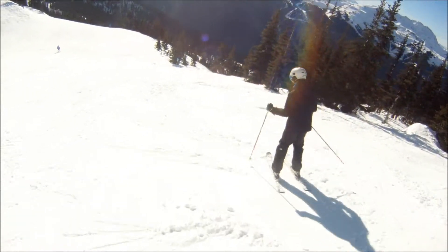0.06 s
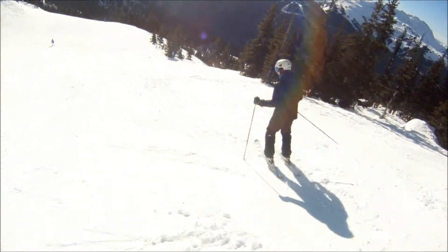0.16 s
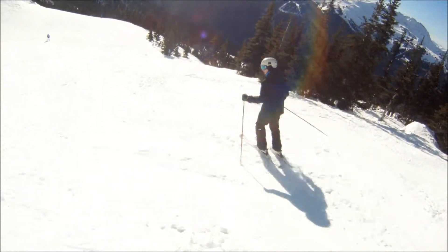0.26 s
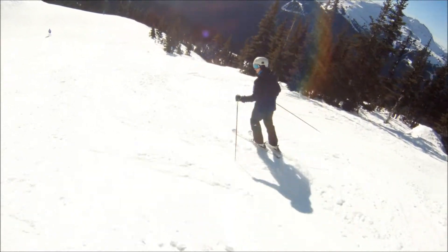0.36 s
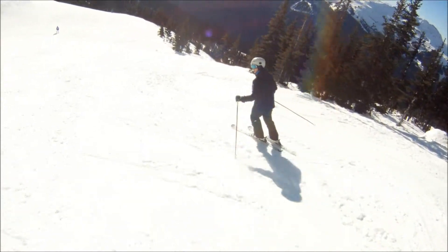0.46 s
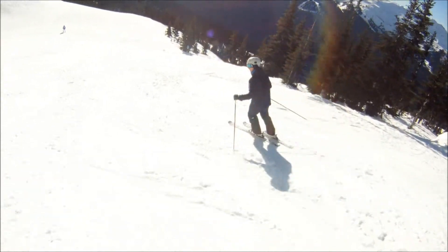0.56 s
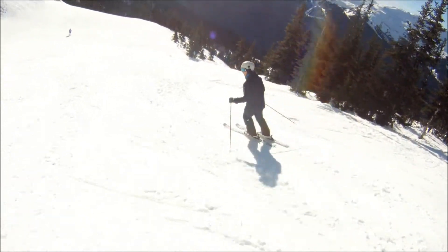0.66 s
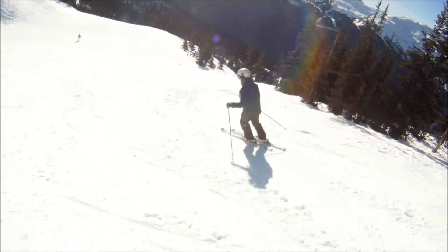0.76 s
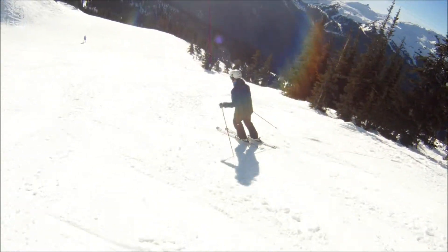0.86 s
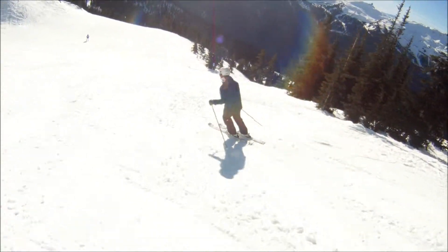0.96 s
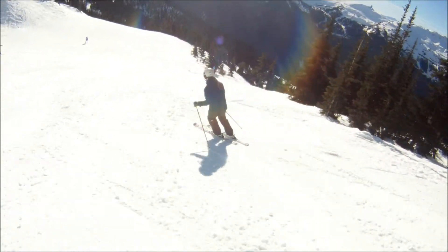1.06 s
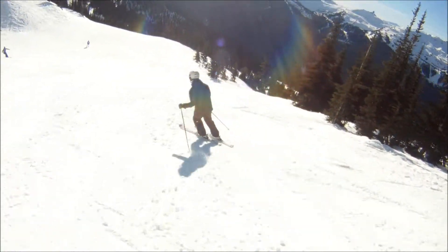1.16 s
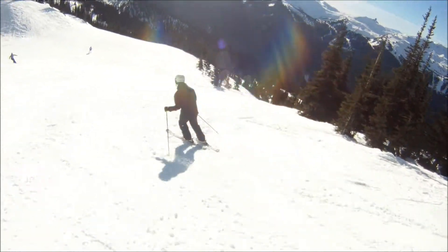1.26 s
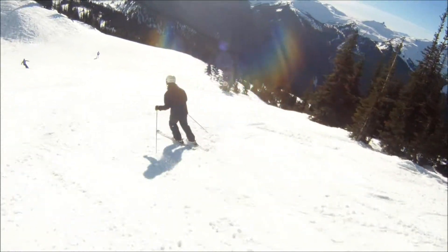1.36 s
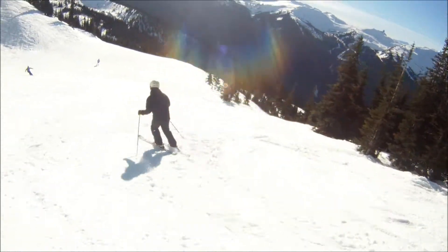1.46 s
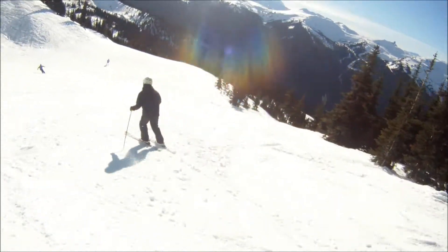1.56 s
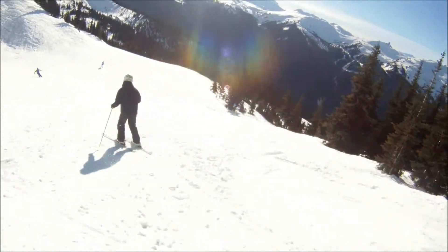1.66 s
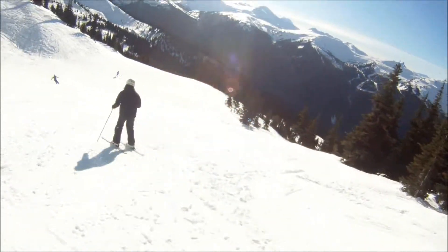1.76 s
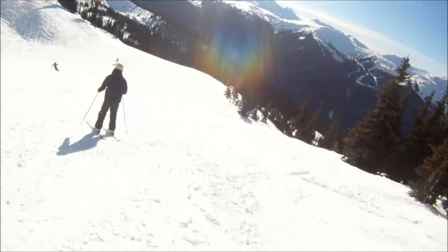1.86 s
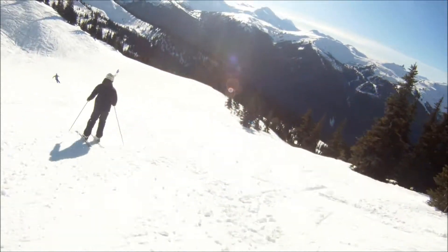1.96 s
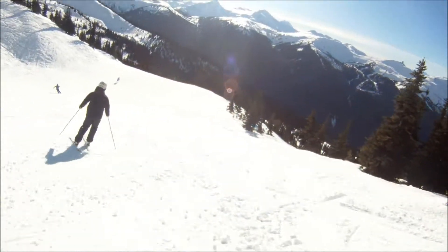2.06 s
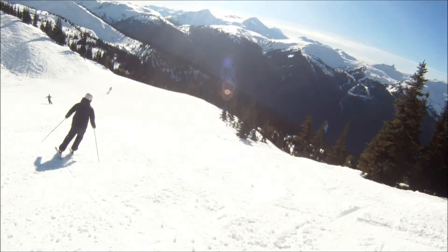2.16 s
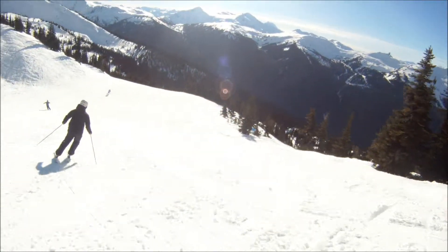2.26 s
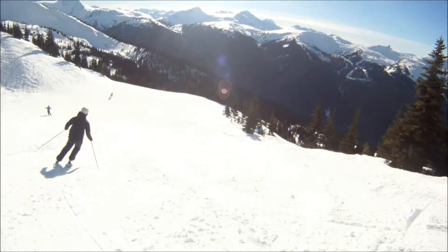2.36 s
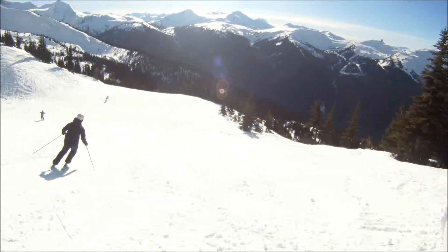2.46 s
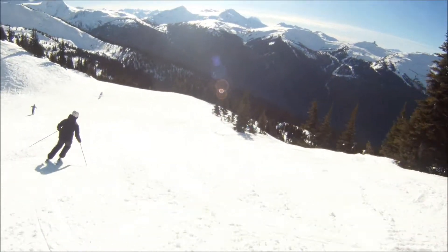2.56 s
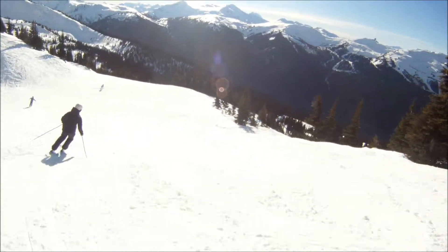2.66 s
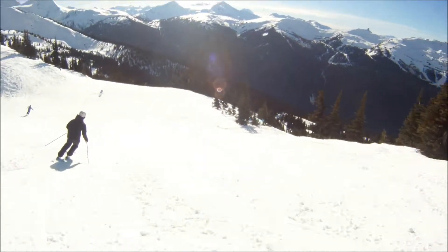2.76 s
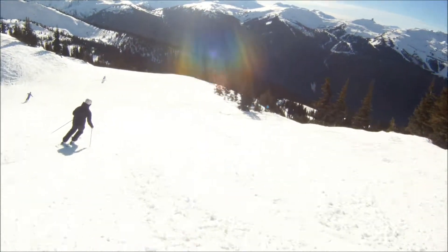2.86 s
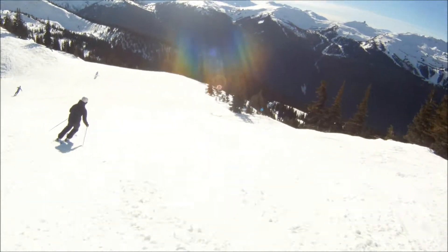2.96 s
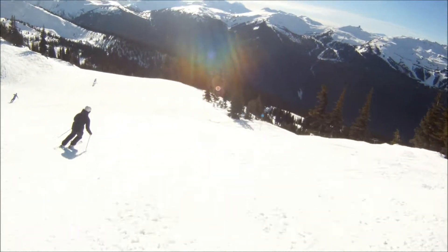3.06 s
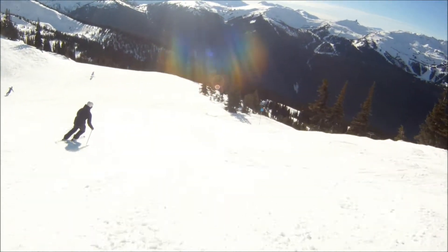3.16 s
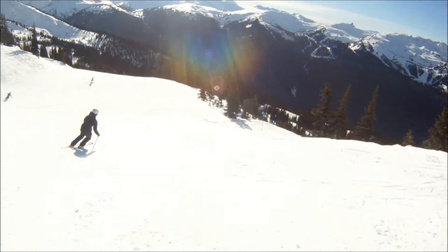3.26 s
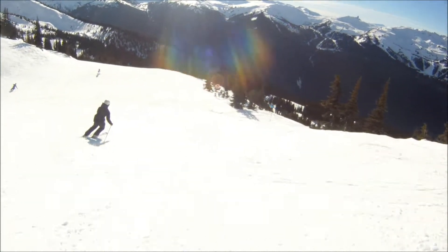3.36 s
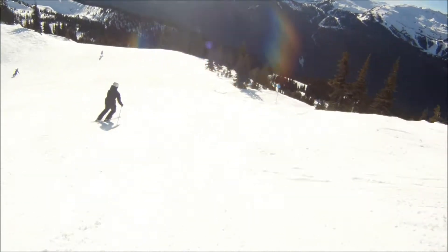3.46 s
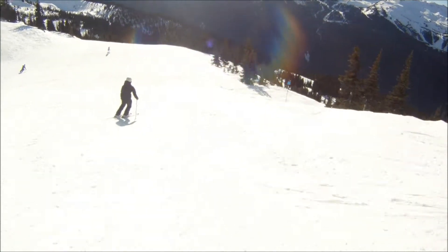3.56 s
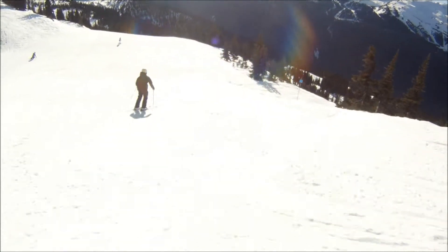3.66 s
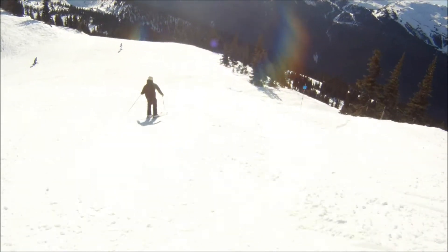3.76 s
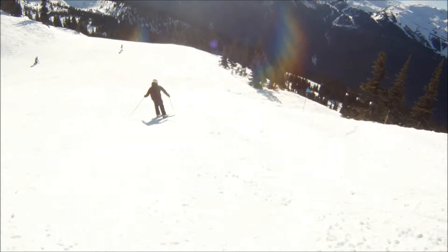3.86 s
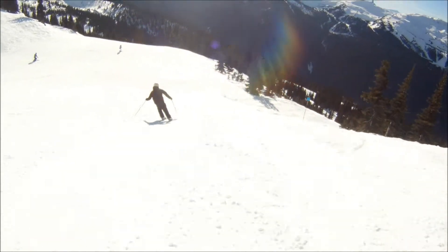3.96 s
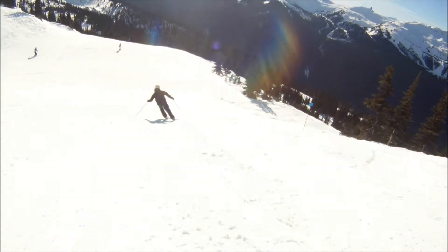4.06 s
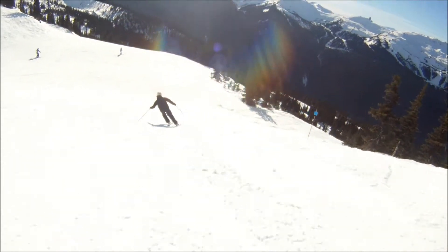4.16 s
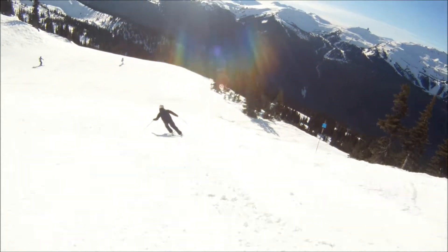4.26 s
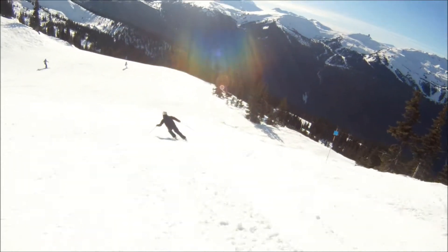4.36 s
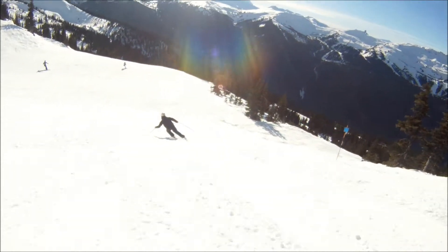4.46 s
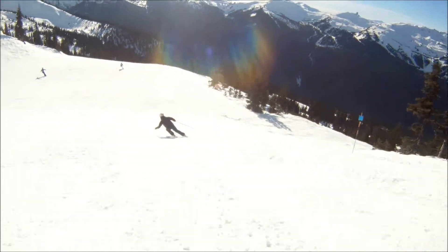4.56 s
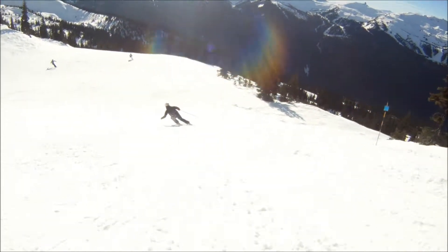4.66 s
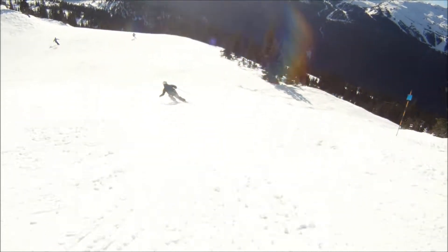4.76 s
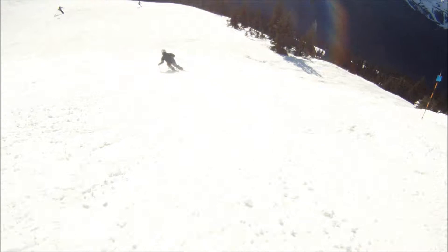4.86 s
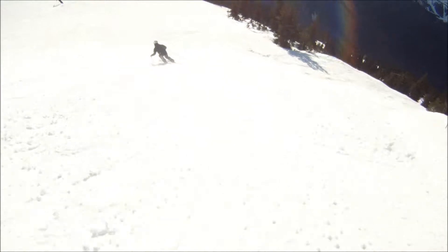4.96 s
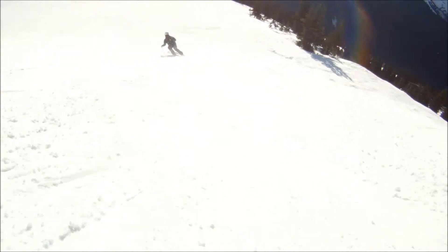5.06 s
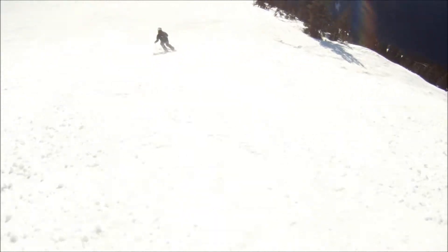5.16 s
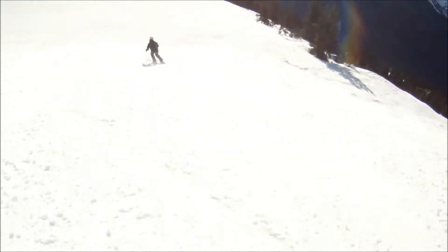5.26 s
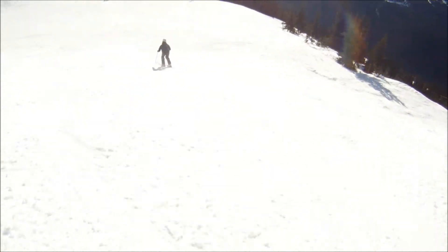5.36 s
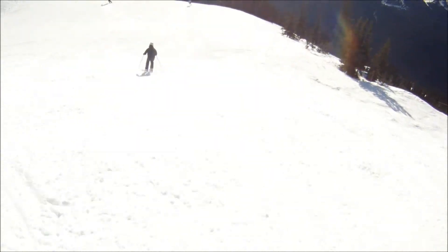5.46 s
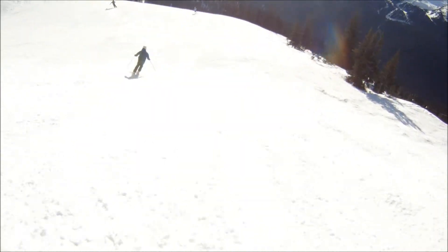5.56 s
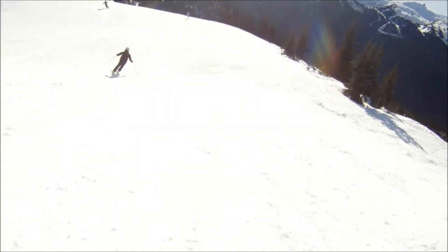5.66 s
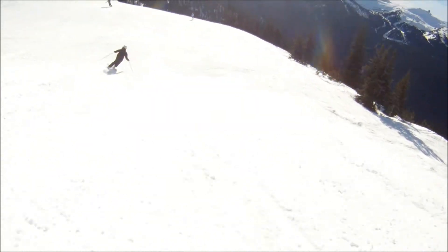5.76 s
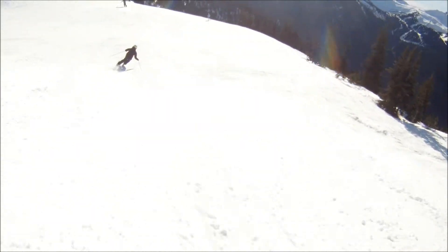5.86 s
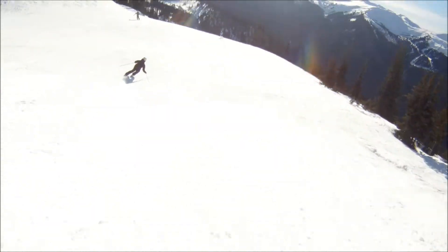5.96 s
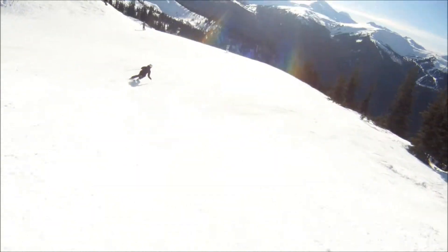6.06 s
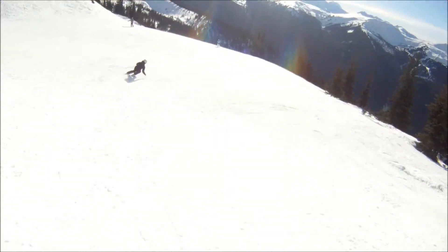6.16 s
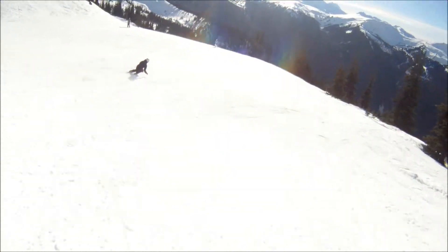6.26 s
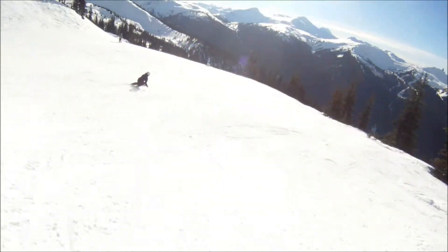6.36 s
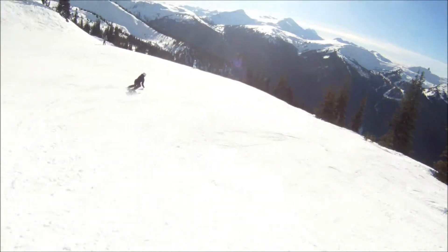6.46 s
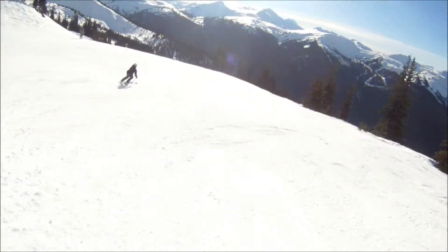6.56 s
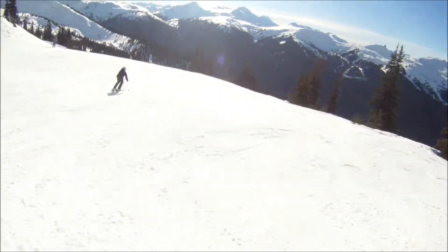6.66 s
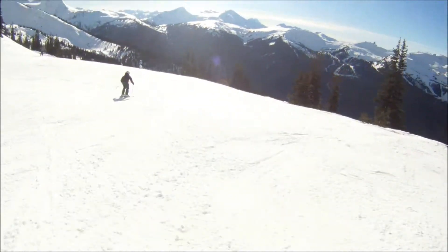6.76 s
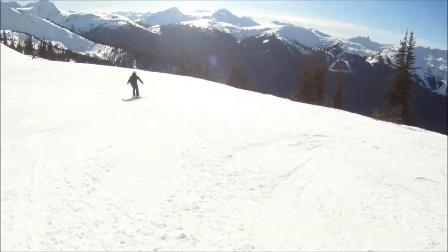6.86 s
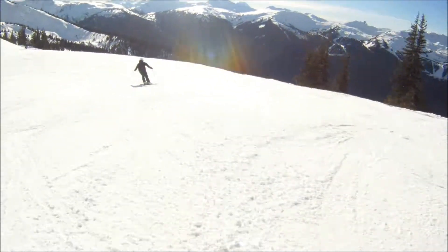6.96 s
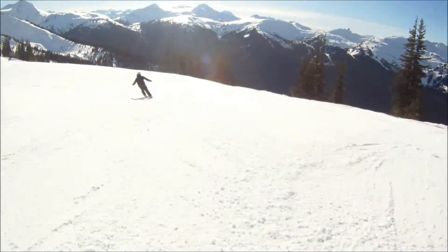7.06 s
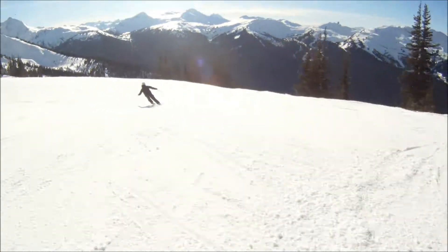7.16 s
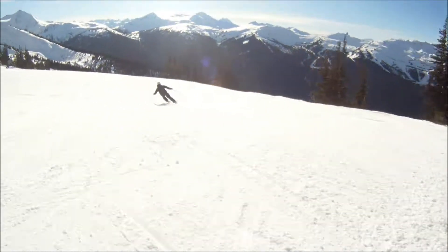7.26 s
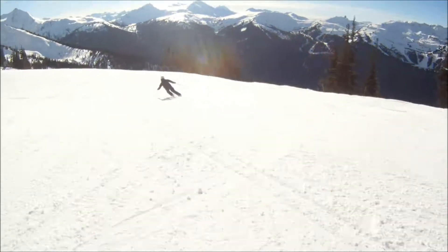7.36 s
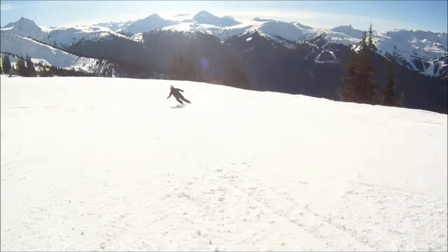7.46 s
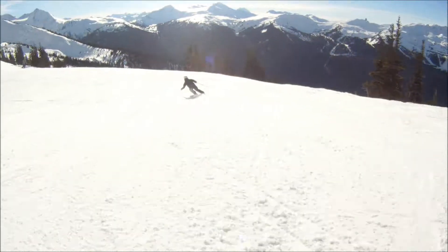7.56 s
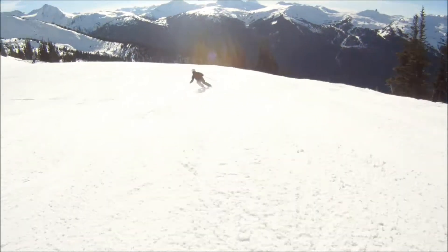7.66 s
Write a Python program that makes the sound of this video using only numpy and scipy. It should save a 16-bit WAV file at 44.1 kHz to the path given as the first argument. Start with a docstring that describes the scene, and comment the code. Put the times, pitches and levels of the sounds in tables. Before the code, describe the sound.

Skis gather speed over packed snow, a faint hiss growing into a gritty, boxy roar with low wind buffeting and sharp camera knocks.

```python
"""Skis gather speed on packed snow: the bases rush, the edges throw up crystals and the skis judder.
Snow noise is random grain snaps over smooth friction, coloured by the camera's closed plastic case.
One hollow note, short rasps and crumbs of crushed ice join it; ruts swell a low body rumble.
Wind noise buffets the case, decaying sines make the jolts and knocks, and a faint hiss lies below.
The camera samples slowly and holds each value, which mirrors the sound into a gritty treble."""
import sys
import numpy as np
from scipy import signal
from scipy.fft import rfft, irfft
from scipy.io import wavfile
from scipy.ndimage import uniform_filter1d

SR = 44100
rng = np.random.default_rng(int(sys.argv[2]) if len(sys.argv) > 2 else 0)


def output_pcm(signal):
    """Save a mono or channel-first signal as 16-bit PCM at the path in sys.argv[1].

    Samples are clipped to [-1, 1] before scaling.
    """
    pcm = np.clip(np.atleast_2d(signal).T, -1, 1) * 32767
    wavfile.write(sys.argv[1], SR, np.round(pcm).astype(np.int16))


N = 339570
TIME = np.arange(N) / SR
HZ = np.maximum(np.arange(N // 2 + 1) * SR / N, 1)   # spectrum bins, kept off zero


def from_db(db):
    """Decibels to gain."""
    return 10 ** (np.asarray(db) / 20)


def rms_one(x):
    """Scale to rms 1."""
    return x / np.sqrt(np.mean(x ** 2) + 1e-20)


def in_time(rows):
    """Read each column of a curve at every sample."""
    times, *columns = np.transpose(rows)
    return [np.interp(TIME, times, column) for column in columns]


def slope_db(points):
    """A spectrum joined by straight lines in log frequency."""
    hz, db = np.transpose(points)
    return np.interp(np.log(HZ), np.log(hz), db)


def coloured(x, db):
    """Give a noise a spectrum; rms 1."""
    return rms_one(irfft(rfft(x) * from_db(db), N))


def above_db(edge_hz, order):
    """Response of a high-pass."""
    return -10 * np.log10(1 + (edge_hz / HZ) ** (2 * order))


def below_db(edge_hz, order):
    """Response of a low-pass."""
    return -10 * np.log10(1 + (HZ / edge_hz) ** (2 * order))


def drift(rate_hz):
    """Slow random wandering with rms 1."""
    return coloured(rng.standard_normal(N), below_db(rate_hz, order=2))


def bell(t, spread):
    """A smooth rise and fall of height 1 around one moment."""
    return np.exp(-.5 * ((TIME - t) / spread) ** 2)


def swells(rows):
    """One smooth rise and fall for each event, a row apiece."""
    return np.array([size * bell(t, spread) for t, size, spread in rows])


def with_swells(base_db, rows):
    """A level with swells on top, added in power; as a gain."""
    peaks = swells([(t, from_db(db), spread) for t, db, spread in rows])
    return np.sqrt(from_db(base_db) ** 2 + np.sum(peaks ** 2, axis=0))


def ring(drive, hz, t60):
    """A two-pole resonator: a unit click sets a decaying sine of about height 1 ringing."""
    radius = from_db(-60 / (t60 * SR))
    turn = 2 * np.pi * hz / SR   # radians per sample
    feedback = [1, -2 * radius * np.cos(turn), radius * radius]
    return signal.lfilter([0, np.sin(turn)], feedback, drive + 1e-18)


def strikes(times, db):
    """One click for each blow."""
    clicks = np.zeros(N)
    clicks[np.round(times * SR).astype(int)] = from_db(db)
    return clicks


def crystals(per_s, size_db, smooth_db):
    """Snow grains snap at random with uneven sizes, over smooth friction of the base; rms 1."""
    unevenness = np.minimum(rng.exponential(1, N), 3)
    sizes = from_db(size_db * unevenness) * rng.choice([-1, 1], N)
    snaps = rng.random(N) < per_s / SR
    grains = sizes * snaps / np.sqrt(per_s)   # more grains, each smaller: the level stays even
    friction = from_db(smooth_db) * rng.standard_normal(N)
    return rms_one(rms_one(grains) + friction)


# Broad tone of snow noise inside the case: f/Hz, relative level/dB
CASE_TONE = [(250, -13.5), (420, -18), (620, -9), (1000, -8), (3300, -8.5), (3750, -18.5), (5400, -26.5),
             (5900, -29)]
# Resonances (boosts) and hollows (cuts) of the case: f/Hz, width at half the dB/Hz, level/dB
CASE_RESONANCES = [(240, 24, -2.5), (768, 126, 4.5), (922, 116, 5), (1058, 46, 4), (1228, 230, -6),
                   (1480, 190, -0.5), (1790, 200, -2.5), (2240, 410, 3), (2620, 110, 4), (3212, 73, 4),
                   (3594, 100, 3.5), (3860, 150, -2.5), (4000, 170, 3), (4420, 270, -3.5), (4800, 240, 4)]


def case_db():
    """The closed case passes some pitches and swallows others."""
    response = slope_db(CASE_TONE)
    for hz, width, db in CASE_RESONANCES:
        response = response + db * .5 ** ((2 * (HZ - hz) / width) ** 2)
    return response


# Tone of the faint hiss: f/Hz, relative level/dB
HISS_TONE = [(100, 2.5), (700, 4), (1200, -0.5), (2200, 1), (2620, 5), (2820, -4), (3000, 2), (3170, -4),
             (3650, 4), (3860, -8), (4040, -2.5), (4550, -12), (4880, -8), (5800, -16)]


def soft_hiss():
    """A faint, finely crackling hiss: small grains over smooth noise, wavering slightly."""
    level = from_db(-56.5 + 1.0 * drift(25))
    return level * coloured(crystals(2500, size_db=-0.5, smooth_db=2.0), slope_db(HISS_TONE))


BREEZE_DB, BREEZE_FOLLOWS = -39, 0.15   # level at the reference speed; share of the speed's dB swing
# Tone of the buffeting: f/Hz, relative level/dB
BUFFET_TONE = [(10, -1.5), (22, -5), (33, 1), (42, 4), (52, -8.5), (70, -22), (120, -42), (300, -68)]
# Gusts on the case: t/s, peak level/dB, spread/s
WIND_GUSTS = [(0.605, -33.5, 0.024), (0.694, -39, .022), (1.156, -36, .04), (1.45, -30.5, 0.055),
              (1.757, -36.5, 0.087), (2.003, -31.5, 0.037), (2.5, -35, 0.033), (2.858, -32, 0.12),
              (3.346, -38.5, .09), (4.25, -40, 0.097), (4.917, -36, 0.06), (5.687, -29.5, .06),
              (6.013, -28, 0.094), (7.264, -31.5, 0.19)]
# Drops in the breeze: t/s, loss of level/dB, spread/s
WIND_LULLS = [(.79, 8, 0.03), (3.65, 15, 0.064), (4.53, 8, .07), (5.14, 10.5, 0.044)]


def wind(speed_db):
    """Eddies push on the case in low, lumpy waves: a breeze that grows with speed, gusts and lulls."""
    breeze_db = BREEZE_DB + BREEZE_FOLLOWS * speed_db - swells(WIND_LULLS).sum(axis=0)
    strength = with_swells(breeze_db, WIND_GUSTS)
    eddies = coloured(rng.standard_normal(N), slope_db(BUFFET_TONE))
    # dividing by the local level evens out the lumps
    lumps = np.sqrt(uniform_filter1d(eddies ** 2, size=7000) + 0.017)
    return strength * eddies / lumps


# Jolts that sway the camera: t/s, drive level/dB (the strongest also sets the peak of the layer)
ARM_JOLTS = [(.206, -27.5), (1.391, -27), (1.446, -21), (1.652, -20), (2.801, -30), (5.833, -21.5),
             (5.918, -11), (6.229, -14.5)]


def jolts(sway_hz=39, t60=0.11):
    """Two resonators in a row make each jolt swell, then die away in a few slow swings."""
    times, db = np.transpose(ARM_JOLTS)
    sway = ring(ring(strikes(times, db), sway_hz, t60), sway_hz, t60 / 2)
    return -from_db(db.max()) * sway / np.abs(sway).max()


# Knocks on the mount: t/s, dull thud drive level/dB, hard clack drive level/dB
MOUNT_KNOCKS = [(1.336, -37, -32), (1.438, -40, -40), (1.596, -43, -31), (1.737, -32, -44),
                (2.048, -42, -42), (2.3677, -26, -24.5), (2.786, -32, -34), (5.475, -34, -35.5),
                (5.8309, -22, -8), (5.9202, -19.5, -11.5), (6.092, -32, -40), (6.179, -30, -35.5)]
# Ringing modes of the mount and case: f/Hz, relative level/dB, time to fall 60 dB/s
MOUNT_MODES = [(98, 0, 0.043), (187, -4.5, 0.051), (232.6, -5, 0.12), (468, -36, 0.0051), (820, -13, 0.053),
               (888, -4, 0.027), (1110, -16, 0.015)]


def knocks(split_hz=400):
    """The camera bumps in its mount: the arm rings the low modes, the case the high ones."""
    times, thud_db, clack_db = np.transpose(MOUNT_KNOCKS)
    thud, clack = strikes(times, thud_db), strikes(times, clack_db)
    ringing = np.zeros(N)
    for hz, db, t60 in MOUNT_MODES:
        blow = thud if hz < split_hz else clack
        ringing += from_db(db) * ring(blow, hz, t60)
    return -ringing


# Crumbs of ice crushed under an edge: t/s, level before the shower gain/dB, decay/s
ICE_CRUMBS = [(.047, -60, .006), (.082, -59, 0.011), (.167, -54, .006), (0.775, -55, .014),
              (1.453, -47, .006), (1.468, -47, 0.01), (1.596, -48, 0.009), (1.722, -42, .003),
              (1.836, -48.5, 0.019)]


def crunches():
    """Each crumb of ice bursts into a sudden, short shower of bright grains."""
    shower = np.zeros(N)
    for t, db, decay in ICE_CRUMBS:
        shower += from_db(db) * (TIME >= t) * np.exp(-np.abs(TIME - t) / decay)
    tone = 0.53 * case_db() + above_db(3700, order=1) + below_db(4600, order=8)
    return 1.84 * shower * coloured(crystals(4500, size_db=6.0, smooth_db=-11), tone)


# An edge bites and rasps on one pitch: t/s, f/Hz, level/dB, spread/s
EDGE_RASPS = [(2.24, 1690, -41, .012), (5.336, 1480, -36.5, 0.089)]


def rasps(width_hz=200):
    """A biting edge sticks and slips, which gathers its noise around one pitch."""
    out = np.zeros(N)
    for t, hz, db, spread in EDGE_RASPS:
        peak_db = -20 * np.log10(1 + (2 * (HZ - hz) / width_hz) ** 2)
        rasp = coloured(rng.standard_normal(N), peak_db)
        out += from_db(db) * bell(t, spread) * rasp
    return out


NOTE_DB, NOTE_FOLLOWS = -38.5, 0.76   # level at the reference speed; share of the speed's dB swing
FLARE_SPREAD_S = 0.019
# Flares of the hollow note under the running edges: t/s, peak level/dB
NOTE_FLARES = [(.27, -55), (.42, -51), (.75, -48), (1.15, -54), (1.27, -45.5), (2.05, -42), (2.14, -41)]


def hollow_note(speed_db, hard_db, hz=768, t60=0.032):
    """Friction noise keeps a narrow resonance sounding, stronger at speed and on hard snow."""
    flares = [(t, db, FLARE_SPREAD_S) for t, db in NOTE_FLARES]
    strength = with_swells(NOTE_DB + NOTE_FOLLOWS * speed_db + hard_db, flares)
    return strength * rms_one(ring(ring(rng.standard_normal(N), hz, t60), hz, t60 / 2))


RUMBLE_DB, RUMBLE_FOLLOWS = -43, 0.58   # level at the reference speed; share of the speed's dB swing
RUMBLE_PER_HARDNESS = 0.46   # dB for each dB of hardness
# Tone of the rumble through the skier's body: f/Hz, relative level/dB
RUMBLE_TONE = [(30, -1), (70, 0.5), (110, 0.5), (190, -3), (241, 0.5), (290, -9), (420, -9), (800, -35)]
# Rutted patches that shake the skier: t/s, rumble level/dB, spread/s
RUT_PATCHES = [(.17, -56, .09), (1.45, -49, .06), (1.76, -48, 0.11), (4.8, -47, .14), (6.22, -41.5, .08),
               (7.15, -38, 0.18), (7.55, -39, .08)]


def body_rumble(speed_db, hard_db):
    """The skier's body carries low shaking, stronger at speed, on hard snow and over ruts."""
    steady_db = RUMBLE_DB + RUMBLE_FOLLOWS * speed_db + RUMBLE_PER_HARDNESS * hard_db
    shaking = with_swells(steady_db, RUT_PATCHES) * from_db(0.66 * drift(8.4))
    return shaking * coloured(rng.standard_normal(N), slope_db(RUMBLE_TONE))


TOP_SPEED_DB = -27.5   # reference speed, as a level of the rush before its trim
# The run: t/s, speed as rush level before its trim/dB, relative hardness of the snow/dB
SKI_RUN = [(0, -61, -4), (.3, -62, -0.5), (.5, -56, -2), (.8, -54.5, 1.5), (1.3, -48, -1),
           (1.95, -41.5, -1), (2.55, -41, 1), (3.3, -36.5, -0.5), (3.75, -36, 0), (4.15, -32.5, 0.5),
           (4.4, -33.5, -2), (5.0, -33, 2), (5.35, -30.5, -0.5), (5.8, -29.5, 1.5), (6.15, -29.5, -1),
           (6.75, -28, -0.5), (7.2, -27, 0), (7.7, -28, 2.5)]
# The edges dig in: t/s, extra load level/dB, spread/s
EDGE_BITES = [(1.462, 3.5, 0.022), (1.65, 4, 0.037), (1.87, 0.5, .025), (2.27, 2.8, 0.025),
              (2.76, 1.1, 0.068), (6.68, 2, .03)]
# The skis go light between turns: t/s, load level lost/dB, fading time on each side/s
TURN_RELEASES = [(1.54, 2.5, .02), (1.775, 2.5, 0.023), (3.58, 3, .07), (4.49, 2, 0.037), (5.153, 9, 0.045),
                 (6.08, 2.5, 0.026), (6.59, 2.5, .025), (7.45, 1.5, 0.079)]


def motion():
    """Speed against the reference, snow hardness and edge load, in dB; releases peak sharply."""
    speed_db, hard_db = in_time(SKI_RUN)
    load_db = swells(EDGE_BITES).sum(axis=0)
    for t, db, fading in TURN_RELEASES:
        load_db = load_db - db * np.exp(-np.abs(TIME - t) / fading)
    return speed_db - TOP_SPEED_DB, hard_db, load_db


# level at the reference speed (dB), share of the speed's dB swing, dB for each dB of edge load
GRIND_DB, GRIND_FOLLOWS, GRIND_PER_LOAD = -32.5, 0.84, .5
SPRAY_DB, SPRAY_FOLLOWS, SPRAY_PER_LOAD = -31.5, 1.17, 1.06
SPRAY_START_DB, SPRAY_KNEE_DB = -23.5, 0.3   # below this speed the edges throw few crystals


def skis(speed_db, hard_db, load_db, low_hz=1220, high_hz=3000):
    """Grind, rush and spray split the snow noise into bands that grow with speed and edge load."""
    rush_db = TOP_SPEED_DB + speed_db + load_db
    spray_db = SPRAY_DB + SPRAY_FOLLOWS * speed_db + SPRAY_PER_LOAD * load_db
    grind_db = GRIND_DB + GRIND_FOLLOWS * speed_db + GRIND_PER_LOAD * load_db + hard_db
    thrown = 1 / (1 + np.exp((SPRAY_START_DB - speed_db) / SPRAY_KNEE_DB))
    case = case_db()
    per_s = 9000 * from_db(.5 * (rush_db - rush_db.max()))   # more speed breaks more grains
    base_snow = crystals(per_s, size_db=3.0, smooth_db=1.0)
    edge_snow = crystals(per_s, size_db=4.0, smooth_db=0.5)   # the edges break grains of their own

    grind_tone = case + below_db(low_hz, order=8) + above_db(235, order=2)
    grind = from_db(grind_db + 0.6 * drift(26)) * coloured(base_snow, grind_tone)
    rush_tone = case + above_db(low_hz, order=8) + below_db(high_hz, order=14)
    rush = from_db(rush_db - 0.43) * coloured(base_snow, rush_tone)   # small level trim
    spray_tone = case + above_db(high_hz, order=14)
    spray = thrown * from_db(spray_db + 0.06 * drift(60)) * coloured(edge_snow, spray_tone)

    judder = from_db(0.54 * drift(35))   # shared by all three
    return (grind + rush + spray) * judder


def scene():
    """Snow, wind and handling at one microphone."""
    speed_db, hard_db, load_db = motion()
    background = soft_hiss() + wind(speed_db)
    handling = jolts() + knocks()
    details = crunches() + rasps() + hollow_note(speed_db, hard_db)
    run = body_rumble(speed_db, hard_db) + skis(speed_db, hard_db, load_db)
    return (background + handling + details + run)[None]


HOLD_HZ, CUTOFF_HZ = 12000, 15350   # camera sampling rate; top of the passed treble


def sample_and_hold(x, guard_hz=5800):
    """Holding slow samples makes a staircase, whose steps mirror sound about the sampling rate."""
    sound = rfft(x) * from_db(below_db(guard_hz, order=40))
    # differentiate, shift to both sides of the sampling rate, then integrate back
    steps = irfft(sound * 1j * HZ, N) * 2 * np.cos(2 * np.pi * HOLD_HZ * TIME)
    mirror = rfft(steps) / (1j * HZ) * (HZ > HOLD_HZ / 2)
    return irfft(sound + mirror, N)


def record(dry):
    """The microphone passes no steady pressure; the camera samples coarsely; the top is cut steeply."""
    no_steady = signal.butter(1, 12, "high", fs=SR, output="sos")
    pressure = signal.sosfilt(no_steady, dry[0])
    soft_ends = np.minimum(1, np.minimum(TIME, TIME[::-1]) / .003)   # 3 ms fades
    held = sample_and_hold(pressure * soft_ends)
    steep_cut = signal.ellip(12, .1, 90, CUTOFF_HZ, fs=SR, output="sos")
    return signal.sosfilt(steep_cut, held)[None]


dry = scene()
out = record(dry)
output_pcm(out)
```